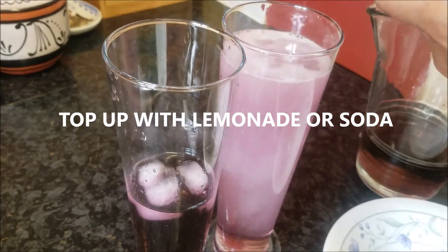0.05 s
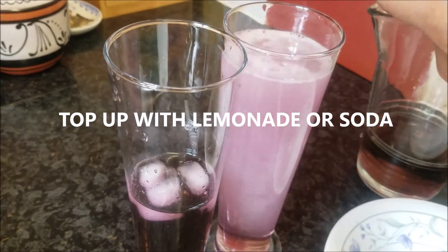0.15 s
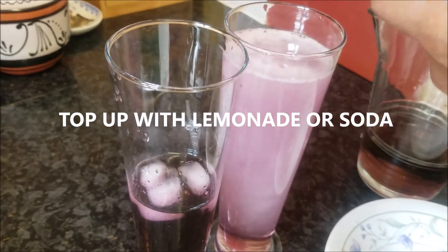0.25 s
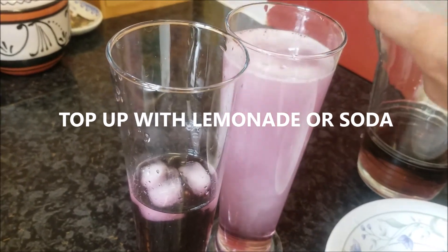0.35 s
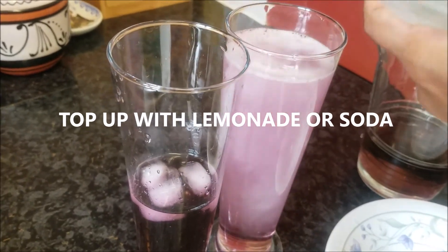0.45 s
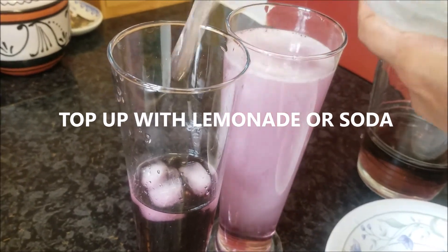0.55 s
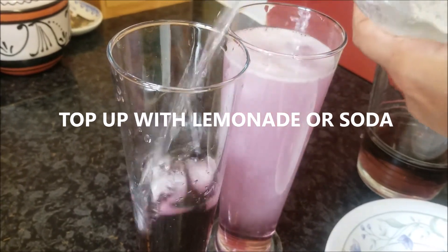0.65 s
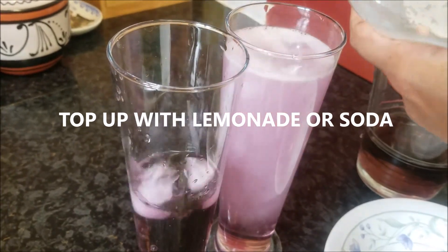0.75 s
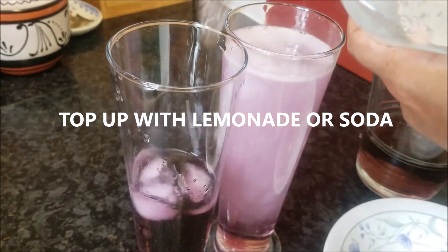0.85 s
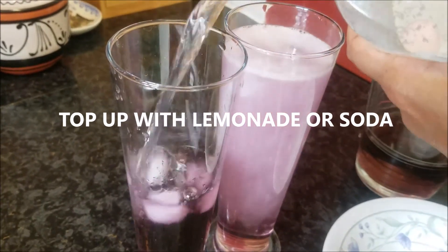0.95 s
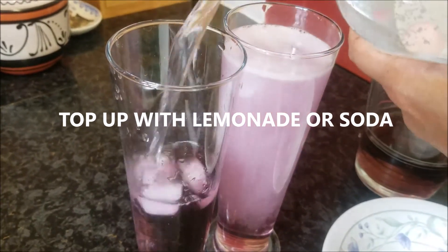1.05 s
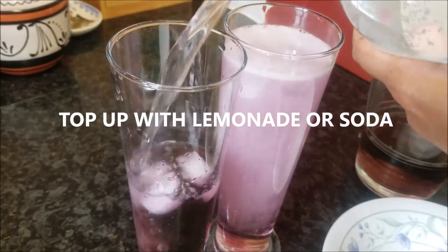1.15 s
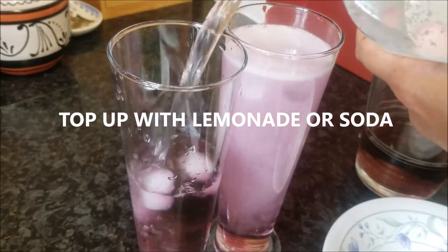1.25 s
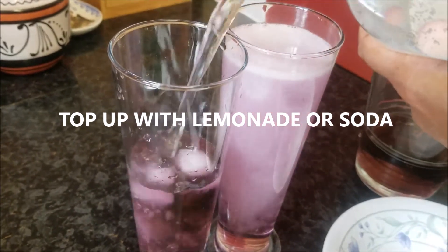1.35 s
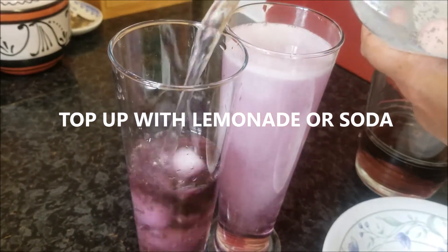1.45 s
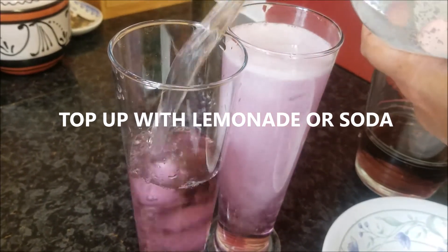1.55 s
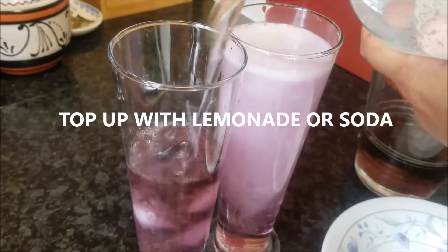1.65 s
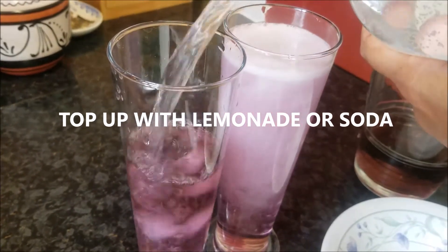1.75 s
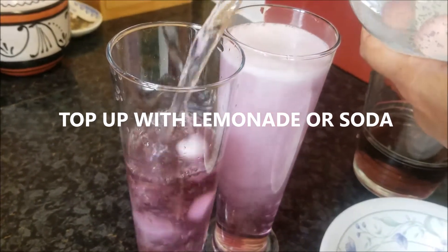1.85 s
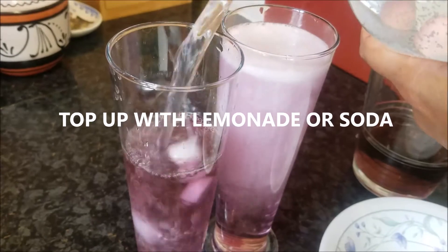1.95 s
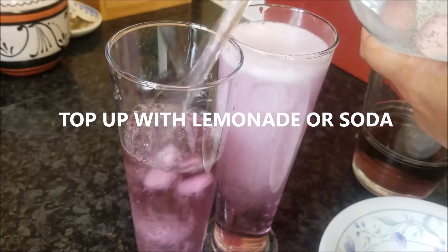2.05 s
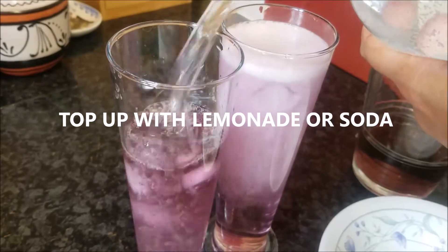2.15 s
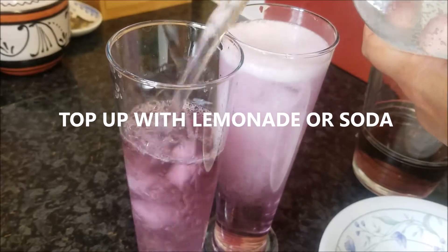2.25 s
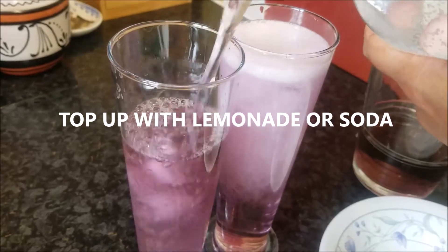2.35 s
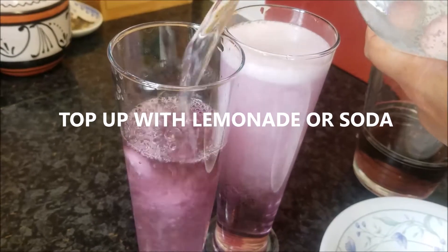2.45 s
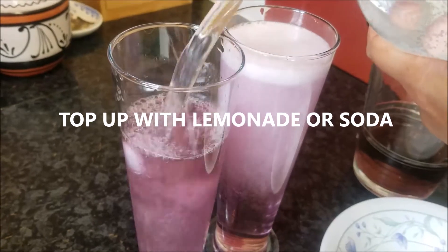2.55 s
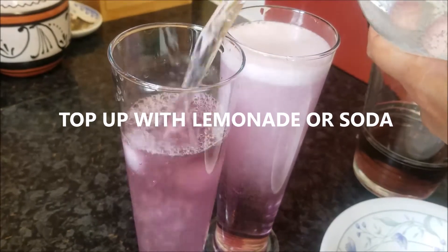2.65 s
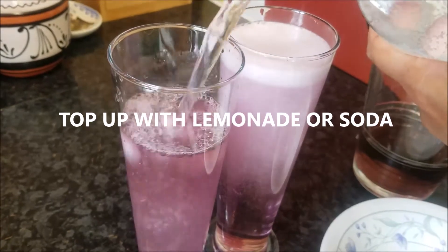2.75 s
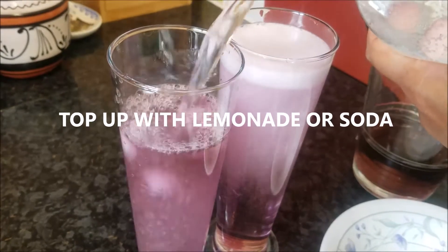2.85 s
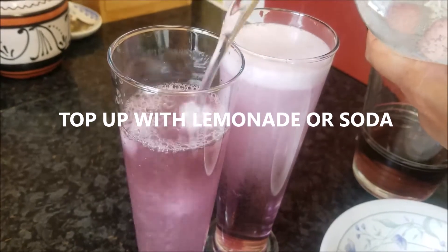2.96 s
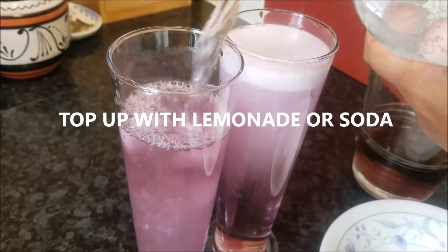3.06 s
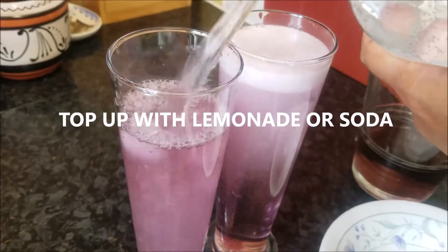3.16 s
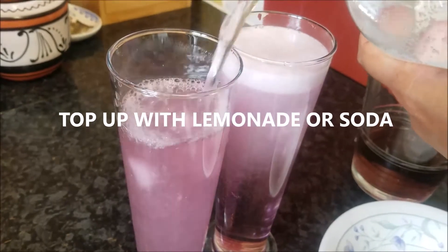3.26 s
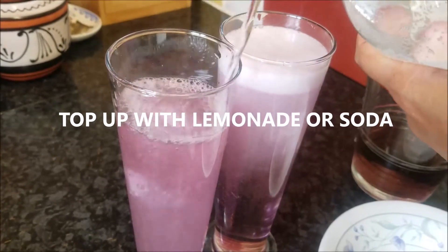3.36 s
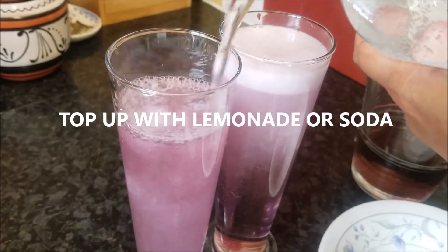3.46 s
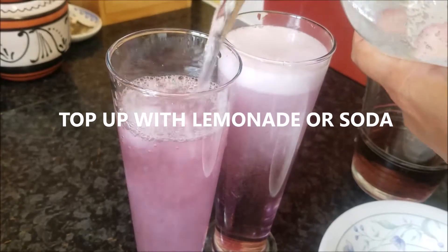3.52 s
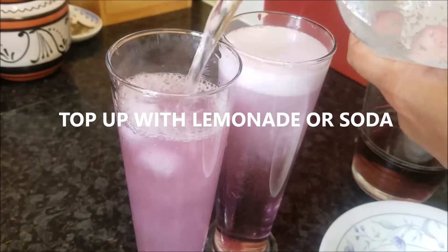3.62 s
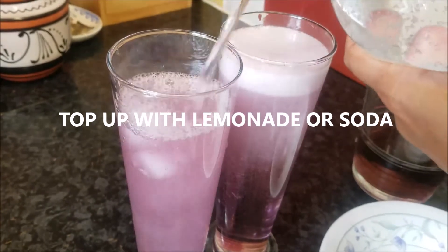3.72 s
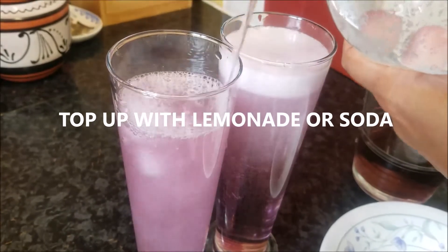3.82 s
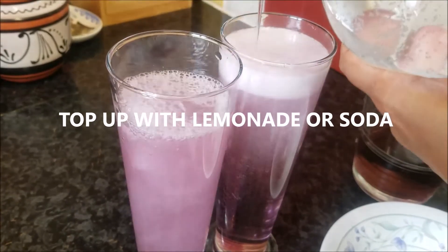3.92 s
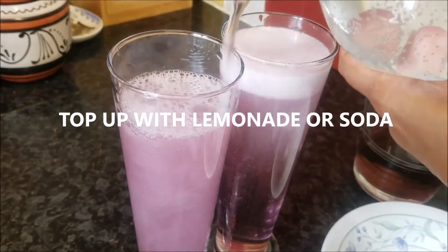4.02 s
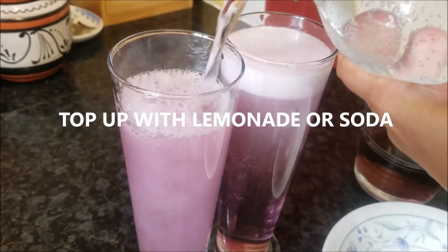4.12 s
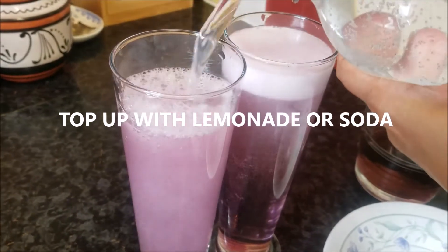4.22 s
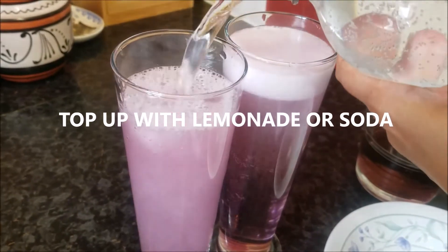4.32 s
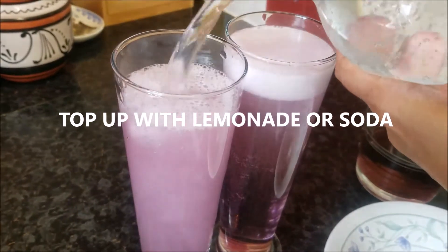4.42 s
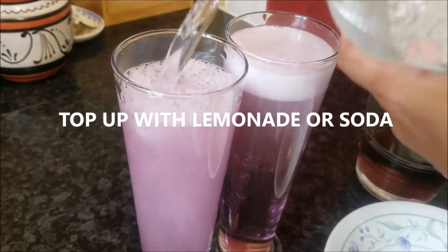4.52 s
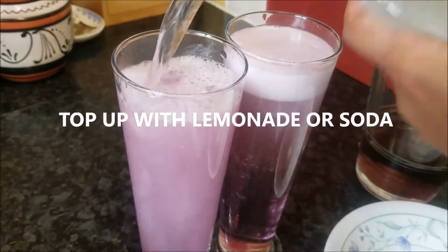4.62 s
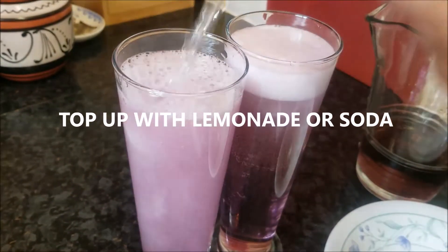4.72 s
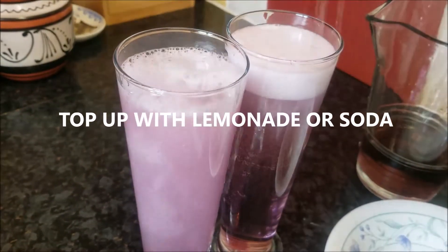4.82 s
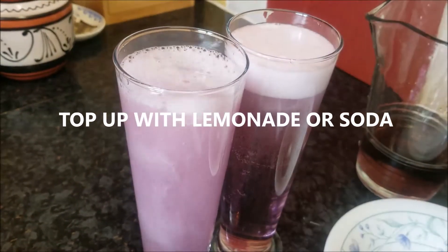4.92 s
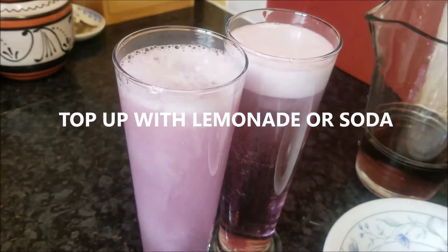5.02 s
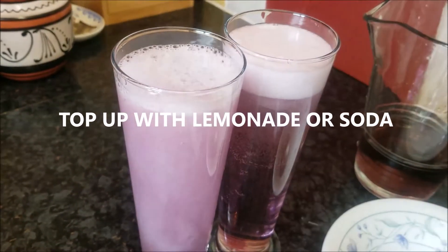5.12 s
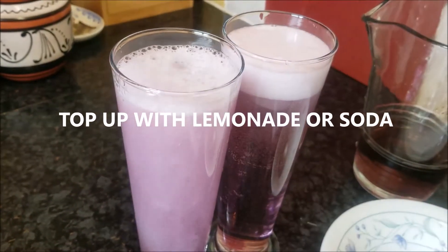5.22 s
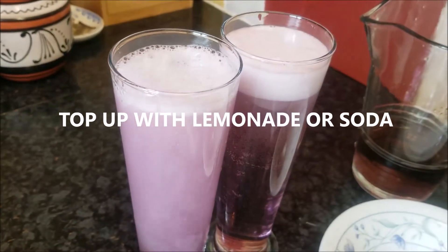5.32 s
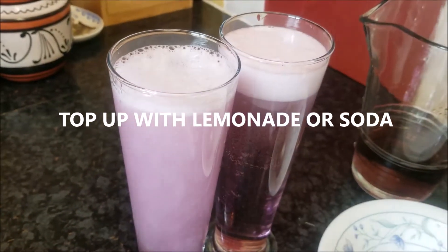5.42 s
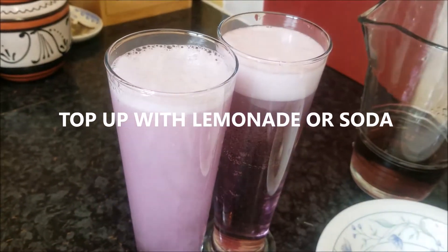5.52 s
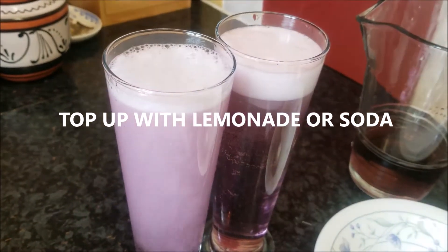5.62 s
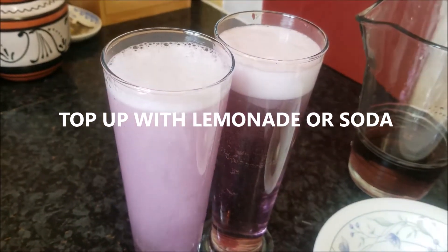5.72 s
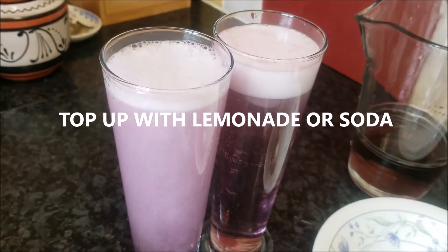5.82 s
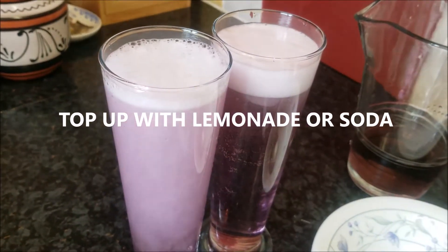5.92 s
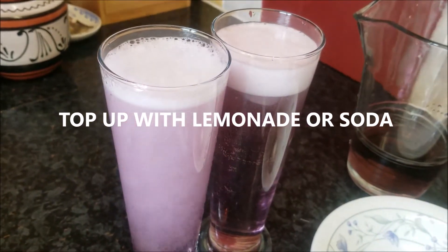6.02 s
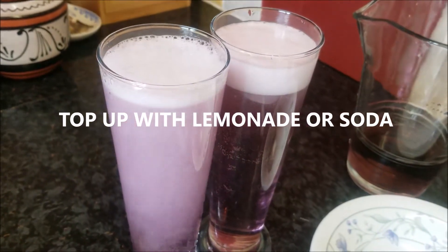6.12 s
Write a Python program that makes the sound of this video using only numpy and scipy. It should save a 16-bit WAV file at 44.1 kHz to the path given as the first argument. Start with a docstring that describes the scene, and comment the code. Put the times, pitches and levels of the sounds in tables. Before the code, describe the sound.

A fizzy drink is poured over cracking ice in a tall glass, bubbles plopping at rising pitch, then a jug is set down.

```python
"""A fizzy drink is poured from a jug over ice in a tall glass on a stone worktop, heard close up in stereo.
Bubbles plop as climbing damped tones; a swarm of them follows the rising pitch of the air column.
Ice cracks, splashes, spray, foam, glugs and the jug's scrape are shaped noise.
Clinks and the set-down are struck modes.
A kitchen appliance hums in sines and thumps softly over room tone; everything fades out in steps."""
import sys
import numpy as np
from scipy import signal
from scipy.fft import rfft, irfft, next_fast_len
from scipy.io import wavfile
from scipy.ndimage import uniform_filter1d, map_coordinates

SR = 44100
rng = np.random.default_rng(int(sys.argv[2]) if len(sys.argv) > 2 else 0)


def transcribe(u):
    """Save the signal u as a 16-bit wav file named by the first command-line argument.

    u: samples, shape (n,) or (channels, n), limited to [-1, 1]; the rate is SR.
    q: integer samples, one column per channel.
    """
    v = np.clip(np.atleast_2d(u).T, -1, 1)
    q = np.round(v * 32767).astype(np.int16)
    wavfile.write(sys.argv[1], SR, q)


N = 272538

# Source levels are mix settings: the output fade and left-right balance come on top.
# Spectra give relative noise density, density_db per Hz.

# Room air spectrum: freq_hz, density_db
AIR_SPECTRUM = [(25, -21.5), (45, -1), (75, 3.5), (150, -1), (240, 0), (330, -7), (500, -12.5), (750, -11),
                (1100, -19), (2000, -21), (3200, -33.5), (8000, -33), (10000, -60)]
# Left-right likeness of the room air: freq_hz, correlation (-1 to 1)
AIR_LIKENESS = [(60, 0.95), (180, 0.92), (550, 0.75), (1650, 0.042), (4970, -0.28), (15000, -0.01)]

HUM_HZ = 99.88  # twice the mains frequency
# Hum overtones, relative to the hum level: multiple of HUM_HZ, left_db, right_db
HUM_OVERTONES = [(1, -2.5, -3.5), (2, -29.5, -29), (3, -31.5, -27), (4, -28.5, -23), (5, -39, -42)]
# Slow drift of the whole hum: time_s, level_db
HUM_LEVEL = [(0.0, -33.5), (0.11, -32), (2.83, -34.5), (4.91, -32), (5.62, -34.5)]
# Motor rotation, one row: pitch_hz, level_db
MOTOR_SHAFT = (48.66, -54.5)
# Thump colour of the casing: freq_hz, density_db
CASING_SPECTRUM = [(140, -83), (155, 7.5), (240, 2.5), (290, -44)]
# Steady stretches of the thump, whose beat stumbles once: start_s, end_s
THUMP_RUNS = [(.192, 3.8), (3.849, 4.0), (4.243, 5.8)]
THUMP_EVERY_S, THUMP_DB, THUMP_SCATTER_DB = .3478, -37, 2

# Foam hiss spectrum: freq_hz, density_db
FOAM_SPECTRUM = [(1760, -39), (3000, -7.5), (3580, -0.5), (4780, -0.5), (7670, -7.5), (8890, 2),
                 (13400, 2.5), (15100, -2), (16200, -5)]
# Foam hiss over time: time_s, level_db
FIZZ_LEVEL = [(0.0, -61.5), (0.59, -64), (1.16, -52), (1.48, -64), (1.78, -55.5), (2.49, -64),
              (5.18, -56.5), (5.55, -56.5)]

# Ice cracks and drop smacks, and near 5 s the jug's harsh contacts as it lands: time_s, level_db,
# brightness_db, body_db (lowest band only)
CRACKS = [(0.0233, -38.5, -16.5, -15), (0.1324, -41, -20, -9), (0.1615, -42, -20.5, -16),
          (0.174, -41.5, -20.5, -0.5), (0.6175, -33, -16, -5), (0.637, -36, -8, -16.5),
          (0.675, -30.5, -12.5, -15), (0.6887, -34.5, -0.5, -13), (0.7162, -18.5, -7.5, -21),
          (0.7248, -12, -7, -26.5), (0.78, -31, 7, -4.5), (0.923, -37, -7.5, -1), (0.975, -24, -12.5, -2),
          (1.023, -28.5, -7, -1), (1.0463, -22.5, -1.5, -8.5), (1.1746, -32, -3.5, -0.5),
          (1.26, -17, -9.5, -19), (1.3039, -22, -10, -5), (1.3294, -27, -13, 2), (1.3534, -30.5, -7, -3.5),
          (1.3877, -34.5, -21, -1), (1.426, -41.5, 5.5, -2), (1.5194, -43, -6.5, 11),
          (1.56, -28.5, -4.5, -1.5), (1.6233, -34, -7.5, -0.5), (1.6717, -20, -7, -7),
          (1.8092, -34.5, 1, 2.5), (1.9144, -43.5, 0.5, 5.5), (1.9395, -34.5, -10.5, 4.5),
          (1.9602, -25, -16.5, -7.5), (1.9839, -25, -13.5, -1.5), (2.0855, -35.5, -24, 6.5),
          (2.1295, -20, -10, 2.5), (2.2048, -33.5, -8.5, 9), (2.228, -31, -12.5, 1),
          (2.3482, -32, -7.5, -4.5), (2.4134, -28.5, -3, -3), (2.5442, -33, -15, 5.5),
          (2.6554, -41, -19.5, -0.5), (2.681, -43.5, 0.5, -8), (2.7561, -33.5, -28, 1.5),
          (2.824, -38.5, -13.5, 2.5), (2.8519, -37.5, -19, -4), (3.02, -43, -7.5, -9),
          (3.086, -45.5, 0, -2), (3.2034, -35, -5, -4.5), (3.2482, -39, -3, 5), (3.398, -47.5, -10.5, 1),
          (3.4424, -52, -2.5, 1), (3.5695, -42, -7.5, 6.5), (3.6605, -27.5, -11.5, 2),
          (3.696, -34, -12, -7.5), (3.8244, -44.5, -11, -1), (3.884, -38, -18.5, -1.5),
          (4.0614, -58.5, 12, -1.5), (4.0956, -46.5, -8.5, 0), (4.1887, -46.5, -10.5, -16),
          (4.458, -44.5, -19, -4), (4.567, -29, -15, -8.5), (4.583, -29, -10.5, -17),
          (4.7132, -40, -12.5, 6), (4.7277, -35, -11.5, -7), (4.7604, -28, -11.5, -4),
          (4.8084, -35.5, -7.5, -12), (4.979, -34, -7.5, -10), (5.019, -30.5, -34.5, -5.5),
          (5.2104, -40, -12, 0), (5.4145, -41.5, -7.5, -17), (5.4304, -40.5, -5.5, -16),
          (5.4919, -39.5, 2.5, -17.5), (5.6214, -51.5, 2.5, 10), (5.66, -43.5, -3.5, -8),
          (5.7108, -35.5, -7.5, -15)]
# Crack bands: four edges in freq_hz, level_db, share of the brightness (ratio), wash_t60_s
CRACK_BANDS = [(510, 720, 1670, 4000, -8, 0, 0.3), (1930, 2690, 5200, 6600, -6.5, 0.04, 0.26),
               (5100, 5100, 7200, 8200, -8, .6, 0.19), (7800, 8060, 13000, 57000, -1, 0.89, 0.18)]
# Resonances of the wet glass wall: freq_hz, width_hz, level_db
GLASS_WALL = [(3100, 14, -4.5), (3490, 42, 2), (4180, 58, -2), (6760, 20, -10), (8890, 560, -8.5),
              (10000, 75, -2), (10700, 49, -1.5), (11200, 88, -8), (13400, 390, -5), (13800, 170, -8)]
CRACK_SCATTER_DB = 3  # chance colour of each crack in each band
SNAP_DB, SNAP_GROWS = 8.5, 0.23  # snap over the wash (dB), rising with the crack's level (dB per dB)

# Stream over time: time_s, gurgle_db, spray_db
POUR_LEVELS = [(0.6, -75, -69), (0.87, -67, -62), (1.2, -52.5, -50), (1.37, -64.5, -61.5),
               (1.69, -41, -53.5), (2.1, -48.5, -64), (2.29, -49, -56.5), (2.47, -57.5, -60.5),
               (2.92, -64.5, -64.5), (3.77, -64, -64.5), (3.9, -81, -76), (4.5, -60, -64),
               (4.85, -66, -61.5), (5.3, -63.5, -62)]
# Single bubbles: time_s, level_db, starting pitch_hz
BUBBLES = [(.724, -31.5, 1996), (0.773, -28.5, 1165), (.943, -33, 880), (.977, -31.5, 910),
           (1.002, -17, 872), (1.003, -25, 710), (1.037, -30, 1080), (1.088, -28.5, 830), (1.133, -38, 895),
           (1.173, -32, 925), (1.22, -14, 930), (1.259, -39, 940), (1.304, -21.5, 982), (1.33, -26.5, 926),
           (1.335, -28.5, 2870), (1.382, -28.5, 780), (1.409, -30.5, 928), (1.521, -19, 922),
           (1.565, -19.5, 943), (1.673, -21.5, 1094), (1.719, -33.5, 1080), (1.719, -38, 2900),
           (1.806, -25, 842), (1.939, -32, 1114), (1.959, -31.5, 3110), (1.989, -27.5, 1080),
           (2.0, -33, 3190), (2.086, -22.5, 1287), (2.132, -16, 1133), (2.16, -35, 2780), (2.16, -25, 1180),
           (2.209, -19.5, 1203), (2.235, -23, 1230), (2.229, -33, 1710), (2.303, -41.5, 1270),
           (2.35, -34, 2750), (2.355, -32.5, 1203), (2.391, -40, 2920), (2.41, -29.5, 1040),
           (2.545, -25.5, 1314), (2.552, -38, 720), (2.657, -45, 3140), (2.67, -35.5, 1457),
           (2.69, -42.5, 2130), (2.755, -38, 3050), (2.756, -28, 1690), (2.759, -33, 930),
           (2.823, -29, 1685), (2.852, -38, 1230), (2.906, -46, 3180), (2.94, -48, 3400),
           (2.972, -45, 3640), (2.992, -52, 1440), (3.043, -45, 1733), (3.075, -43, 1993),
           (3.095, -40.5, 1460), (3.114, -46.5, 3270), (3.2, -36, 1280), (3.25, -30.5, 1760),
           (3.301, -39.5, 1253), (3.398, -43.5, 1190), (3.532, -42.5, 1765), (3.568, -34.5, 1247),
           (3.575, -40, 780), (3.66, -28.5, 1765), (3.662, -41, 3430), (3.665, -34, 860),
           (3.697, -38, 1720), (3.814, -40.5, 1720), (4.761, -41, 2610), (4.853, -36.5, 4010)]
# Air column above the drink: time_s, pitch_hz
AIR_COLUMN = [(.9, 860), (1.5, 917), (2.1, 1151), (2.5, 1303), (2.8, 1606), (3.9, 1750), (4.3, 1910)]
# Spray spectrum: freq_hz, density_db
SPRAY_SPECTRUM = [(880, -30), (1500, -7), (2040, 2.5), (2420, 0.5), (3010, 3.5), (4160, -8), (4620, -5),
                  (6230, -5.5), (7520, -16), (8480, -9), (9000, -16.5), (11700, -38), (19800, -120)]
SMALL_HZ = 2000  # a bubble above this pitch is small
PLOP_T60_S, PIP_T60_S = 0.045, 0.055  # ring time of large and small bubbles
AFTER_DB, AFTER_GROWS, SETTLE_S = -22.5, 0.62, .11  # stirred gurgle: level, dB per bubble dB, t60
PRICKLE_HZ, PRICKLE_DB = 3007, -4.5  # tiny spray bubbles: middle pitch, level over the spray setting

# Modes of the full neighbouring glass: pitch_hz, level_db, t60_s
FULL_GLASS_MODES = [(1267, 1, .38)]
# Nudges that set it ringing: time_s, level_db
GLASS_NUDGES = [(.69, -51.5), (.78, -39), (.925, -43.5)]
# Modes of the tall glass: pitch_hz, level_db, t60_s
GLASS_MODES = [(332.2, 0.5, 0.19), (383, -12, 0.11), (2250, -17.5, 0.07), (2820, -23.5, 0.069),
               (3860, -6, 0.052), (4140, -9.5, 0.099), (4940, -25.5, 0.14), (6980, -1.5, 0.042)]
# Ice on glass: time_s, level_db, upper_modes_db
ICE_CLINKS = [(.727, -24.5, -3), (.781, -35, 3), (.976, -47, 15.5), (1.046, -36, 5.5), (1.259, -48, 30)]

# Air pockets under the ice: time_s, level_db
AIR_POCKETS = [(1.051, -34.5), (1.358, -38), (1.384, -39.5), (1.721, -30.5), (1.81, -32), (1.85, -35),
               (2.122, -48.5), (2.198, -40), (2.408, -42.5)]
# Glug spectrum: freq_hz, density_db
GLUG_SPECTRUM = [(180, -32), (230, -1), (400, 1), (650, -13.5), (900, -34.5)]
GLUG_T60_S = 0.16

# Grit of jug on stone: freq_hz, density_db
GRIT_SPECTRUM = [(500, -30), (900, -1.5), (1500, 0), (2600, -1.5), (3600, -16), (6000, -30)]
SCRAPE_S, SCRAPE_DB = (4.955, 4.985, 5.065, 5.12), -45.5  # start, full, ease, end (s); level
# Modes of the worktop: pitch_hz, level_db, t60_s
WORKTOP_MODES = [(157.3, -1.5, 0.3), (206, 1.5, 0.17), (244, -44, 0.097), (1635, -30, 0.054),
                 (2260, -19.5, 0.02), (2614, -29.5, 0.04), (3030, -36, 0.033)]
# Jug base landing: time_s, level_db, upper_modes_db
SETDOWN_BLOWS = [(4.98, -39, 27), (5.021, -20, 16), (5.056, -35.5, 14)]
# Hollow knock of the jug: pitch_hz, level_db, t60_s
JUG_MODES = [(461, 3, 0.033), (651, -3, 0.029)]
# Jug rocking as it settles: time_s, level_db
JUG_ROCKING = [(4.98, -32.5), (5.092, -26)]

# Left-right balance: freq_hz, left minus right (level_db)
EAR_BALANCE = [(60, 2.5), (3000, 0.16), (8000, -1), (11000, -3), (13500, -7.5), (15500, -8.5)]
# Output fade: time_s, level_db
FADE = [(5.63, 4), (5.7, -7), (5.82, -39), (6.0, -63), (6.1, -80)]
LEAD_S = .0001  # the glasses stand nearer the left side
ROLL_HZ, TOP_HZ = 15900, 16800  # start of the treble drop, band limit


def amp(db):
    """Decibels to gain."""
    return 10 ** (np.asarray(db) / 20)


def unit(x):
    """x at rms 1."""
    return x / np.sqrt(np.mean(x ** 2) + 1e-20)


def along(points, hz):
    """Reads (Hz, value) points along a log frequency axis."""
    f, v = np.transpose(points)
    return np.interp(np.log(hz + 1), np.log(f + 1), v)


def curves(rows):
    """One value per sample for each column after the time."""
    s, *cols = np.transpose(rows)
    return [np.interp(np.arange(N) / SR, s, c) for c in cols]


def wobble(rate):
    """A smooth random curve with rate knots a second."""
    knots = rng.standard_normal(int(N * rate / SR) + 4)
    return map_coordinates(knots, [np.arange(N) * rate / SR])


def filtered(x, response):
    """Shapes x by a response given as a function of frequency."""
    m = next_fast_len(N + 8192)
    return irfft(rfft(x, m) * response(np.fft.rfftfreq(m, 1 / SR)), m)[..., :N]


def rush(spectrum, alike, spiky_db=0., patchy_db=0., peaks=()):
    """Stereo noise of rms 1: tiny uneven bursts, patches of random colour, resonances on top."""
    pair = rng.standard_normal((2, N))
    if spiky_db:
        bursts = np.repeat(rng.standard_normal(N // 40 + 1), 40)[:N]
        pair = pair * amp(spiky_db * bursts)
    if patchy_db:
        z = signal.stft(pair, nperseg=512)[2]
        field = uniform_filter1d(rng.standard_normal(z.shape[1:]), size=4, axis=0)
        field = uniform_filter1d(field, size=5, axis=1)
        pair = signal.istft(z * amp(patchy_db * unit(field)), nperseg=512)[1][:, :N]

    def response(hz):
        # The mid-side angle sets the left-right likeness.
        turn = np.arccos(np.clip(along(alike, hz), -1, 1)) / 2
        ring = 0.84 + sum(amp(db) / (1 + (2 * (hz - c) / w) ** 2) for c, w, db in peaks)
        return amp(along(spectrum, hz)) * ring * [np.cos(turn), np.sin(turn)]

    mid, side = filtered(pair, response)
    return unit(np.array([mid + side, mid - side]))


def add(track, s, sound):
    """Mixes a sound into a track at s seconds."""
    part = track[..., round(s * SR):round(s * SR) + sound.shape[-1]]
    part += sound[..., :part.shape[-1]]


def struck(blows, modes):
    """Each blow rings damped modes; those above the first octave follow the contact's sharpness."""
    track, t = np.zeros(N), np.arange(SR // 3) / SR
    for hz, level_db, t60 in modes:
        ring = amp(level_db - 60 * t / t60) * (1 - np.exp(-t / 0.0027)) * np.sin(2 * np.pi * hz * t)
        is_upper = hz > 2 * modes[0][0]
        for s, db, *upper_db in blows:
            blow_db = db + sum(upper_db) * is_upper + rng.normal(0, 1)
            add(track, s, amp(blow_db) * ring)
    return track


def bubble(hz, t60, t, climb):
    """A damped tone whose pitch climbs as the bubble nears the surface."""
    phase = 2 * np.pi * hz * (t + climb * t * t / t60)
    return amp(-60 * t / t60) * (1 - np.exp(-t / 0.0019)) * np.sin(phase)


def swarm(middle_hz, spread, t60, count):
    """Many small bubbles at chance moments around a pitch given per sample, rms 1."""
    length = 900  # samples per bubble
    start = (rng.random(count) * (N - length)).astype(int)
    size = rng.standard_normal((count, 2))  # chance pitch and chance level
    hz = (middle_hz[start] * np.exp(spread * size[:, 0]))[:, None]
    t = np.arange(length)[None] / SR
    small = amp(3.2 * size[:, 1:]) * bubble(hz, t60, t, climb=0.019)
    places = start[:, None] + np.arange(length)
    return unit(np.bincount(places.ravel(), small.ravel(), N))


def room_tone():
    """Air and fan noise of the kitchen, a little lumpy in level."""
    return amp(-51.5 + 1.9 * wobble(2.6) + 1.0 * wobble(30)) * rush(AIR_SPECTRUM, AIR_LIKENESS)


def appliance():
    """Magnetic hum with overtones, a slower shaft tone and soft casing thumps about three a second."""
    t = np.arange(N) / SR
    hum = 0
    for k, left_db, right_db in HUM_OVERTONES:
        drift = amp(.5 * (k - 3.0) * wobble(6.6))
        hum = hum + amp([[left_db], [right_db]]) * drift * np.sin(2 * np.pi * k * HUM_HZ * t + k)
    hum = hum * np.sqrt(2) * amp(curves(HUM_LEVEL)[0] + 0.16 * wobble(6.2))
    shaft_hz, shaft_db = MOTOR_SHAFT
    shaft = np.sqrt(2) * amp(shaft_db + 0.8 * wobble(5)) * np.sin(2 * np.pi * shaft_hz * t)
    swell, u = np.zeros(N), t[:SR // 5] / 0.015
    for s in np.concatenate([np.arange(*run, THUMP_EVERY_S) for run in THUMP_RUNS]):
        thump_gain = amp(rng.normal(THUMP_DB, THUMP_SCATTER_DB))
        add(swell, s - .012, thump_gain * u * np.exp(-u))
    return hum + shaft + swell * rush(CASING_SPECTRUM, [(200, 0.96)])


def foam():
    """Countless tiny bubbles burst on both glasses: a spiky hiss of wide stereo noise."""
    return amp(curves(FIZZ_LEVEL)[0] + 1.2 * wobble(24)) * rush(FOAM_SPECTRUM, [(5000, 0.045)], spiky_db=1.5)


def cracks():
    """Ice cracks, drop smacks and the jug's harsh landing contacts: a sharp snap and a dying wash, each with
    its own brightness and body."""
    total, t = 0, np.arange(SR // 3) / SR
    rise = 1 - np.exp(-t / 0.0011)
    # Envelopes are summed as power, so that close cracks merge naturally.
    snap = rise * amp(-60 * t / 0.0055) ** 2
    chance_db = CRACK_SCATTER_DB * rng.standard_normal((len(CRACKS), len(CRACK_BANDS)))
    for band, (*edges, band_db, share, t60) in enumerate(CRACK_BANDS):
        power = np.zeros(N)
        wash = rise * (amp(-2.0 - 60 * t / 0.028) ** 2 + amp(-10.5 - 60 * t / t60) ** 2)
        for (s, db, bright_db, body_db), own_db in zip(CRACKS, chance_db[:, band]):
            crack_db = db + band_db + share * bright_db + (band == 0) * body_db + own_db
            snap_power = amp(SNAP_DB + SNAP_GROWS * db) ** 2
            add(power, s - .0006, amp(crack_db) ** 2 * (wash + snap_power * snap))
        spectrum = list(zip(edges, (-13.5, 2.5, -1, -22.5)))
        likeness = [(1500, 0.6), (4000, 0.11), (9000, 0.23)]
        noise = rush(spectrum, likeness, spiky_db=2.0, patchy_db=3.0, peaks=GLASS_WALL)
        total += np.sqrt(power) * noise
    return total


def pour():
    """Bubbles swarm near the air column's pitch, stirred by big plops; returns mono bubbles, stereo spray."""
    gurgle_db, spray_db = curves(POUR_LEVELS)
    single, stir = np.zeros(N), amp(gurgle_db) ** 2  # stir is power
    t, now = np.arange(SR // 6) / SR, np.arange(N) / SR
    for s, db, hz in BUBBLES:
        if hz > SMALL_HZ:
            add(single, s, amp(db) * bubble(hz, PIP_T60_S, t, climb=0.08))
        else:
            add(single, s - .001, amp(db) * bubble(hz, PLOP_T60_S, t, climb=0.012))
            add(stir, s, amp(AFTER_GROWS * db + AFTER_DB - 60 * t / SETTLE_S) ** 2)
    flowing = (now > POUR_LEVELS[0][0]) & (now < POUR_LEVELS[-1][0])
    column_open = now < AIR_COLUMN[-1][0]
    gurgle = column_open * np.sqrt(stir) * swarm(curves(AIR_COLUMN)[0], 0.12, 0.027, count=1500)
    prickle = amp(spray_db + PRICKLE_DB) * swarm(np.full(N, PRICKLE_HZ), 0.3, 0.016, count=1500)
    likeness = [(2000, 1.0), (6000, 0.56)]
    noise = rush(SPRAY_SPECTRUM, likeness, spiky_db=0.5, patchy_db=5.5, peaks=GLASS_WALL)
    spray = amp(spray_db + 1.1 * wobble(21)) * noise
    return single + flowing * (gurgle + prickle), flowing * spray


def neighbour_glass():
    """Nudges make the full glass alongside sing at its own pitch."""
    return struck(GLASS_NUDGES, FULL_GLASS_MODES)


def ice_clinks():
    """Ice knocks the tall glass and rings its modes."""
    return struck(ICE_CLINKS, GLASS_MODES)


def kitchen(x):
    """Hard walls answer with a short decaying noise tail, different in each ear."""
    t = np.arange(SR // 2) / SR
    tail = rng.standard_normal((2, len(t))) * amp(-60 * t / 0.32) * (t > .004)
    return signal.fftconvolve(x[None], tail / np.linalg.norm(tail[0]), axes=1)[:, :N]


def glugs():
    """Large air pockets give low, rough gulps of decaying noise."""
    power, t = np.zeros(N), np.arange(SR // 4) / SR
    for s, db in AIR_POCKETS:
        add(power, s, (1 - np.exp(-t / 0.00463)) * amp(db - 60 * t / GLUG_T60_S) ** 2)
    return np.sqrt(power) * rush(GLUG_SPECTRUM, [(300, 0.75)])


def scrape():
    """The jug grates over the stone as it lands: one stroke of gritty noise."""
    stroke = np.interp(np.arange(N) / SR, SCRAPE_S, [0, 1, 1, 0])
    grit = rush(GRIT_SPECTRUM, [(1500, .6)], spiky_db=3.0, patchy_db=2.5)
    return stroke * amp(SCRAPE_DB + 3 * wobble(60)) * grit


def jug_set_down():
    """The jug base rings the worktop while the hollow jug knocks as it rocks."""
    return struck(SETDOWN_BLOWS, WORKTOP_MODES) + struck(JUG_ROCKING, JUG_MODES)


def scene():
    """The glasses and jug reach the left side first; room tone and appliance fill both."""
    bubbles, spray = pour()
    near = bubbles + neighbour_glass() + ice_clinks() + jug_set_down()
    glasses = near + amp(-6.0) * kitchen(near) + spray + glugs() + scrape() + cracks() + foam()

    def lead(hz):
        return np.exp(2j * np.pi * hz * LEAD_S * np.array([[.5], [-.5]]))

    return filtered(glasses, lead) + room_tone() + appliance()


def record(dry):
    """The right side hears more treble; the fade moves thirty steps a second; the top is band-limited."""
    steps = np.floor(np.arange(N) * 30 / SR) / 30
    fade = amp(np.interp(steps, *np.transpose(FADE)))
    faded = dry * uniform_filter1d(fade, size=200)  # softens each step

    def response(hz):
        balance_db = along(EAR_BALANCE, hz) * np.array([[.5], [-.5]])
        return amp(balance_db - 26 * (hz > ROLL_HZ)) * (hz < TOP_HZ)

    return filtered(faded, response)


dry = scene()
out = record(dry)
transcribe(out)
```